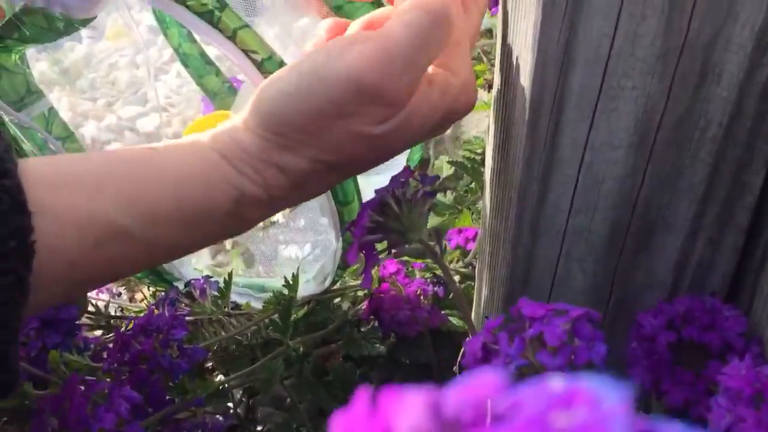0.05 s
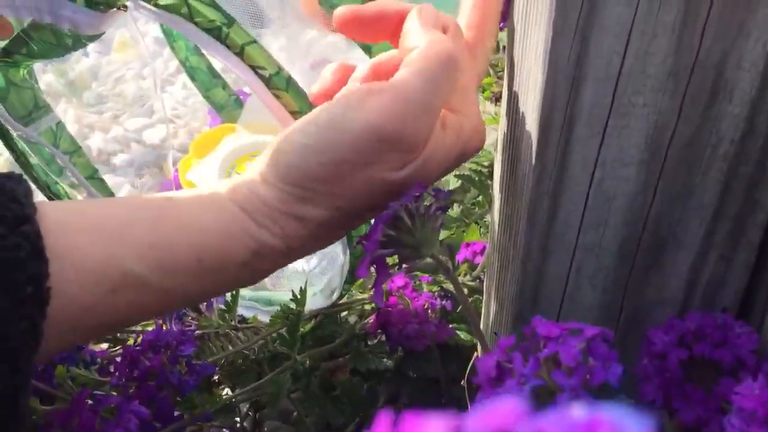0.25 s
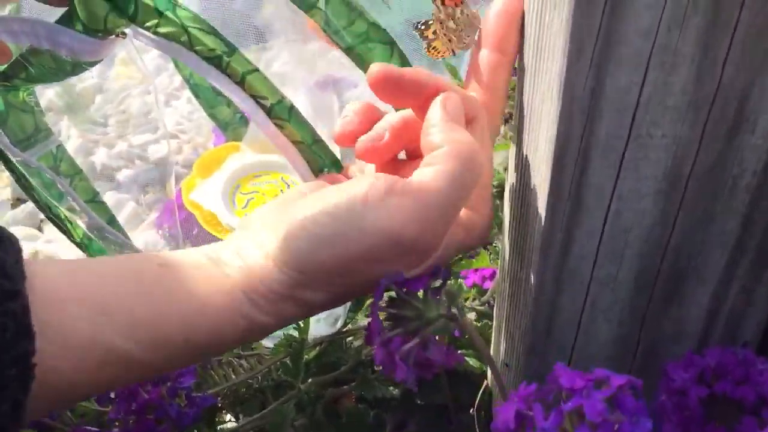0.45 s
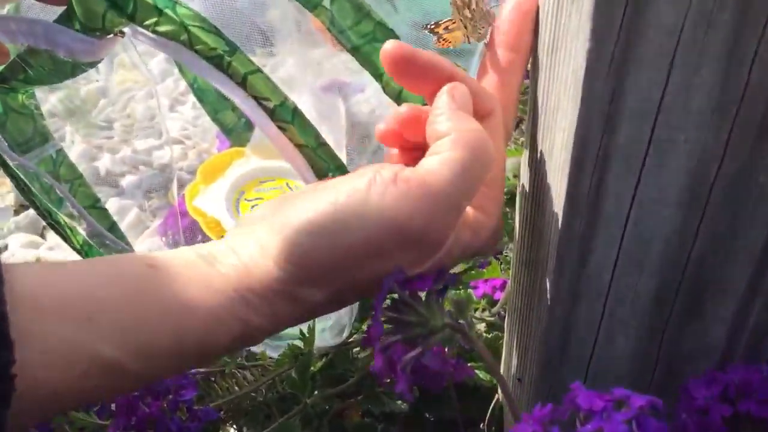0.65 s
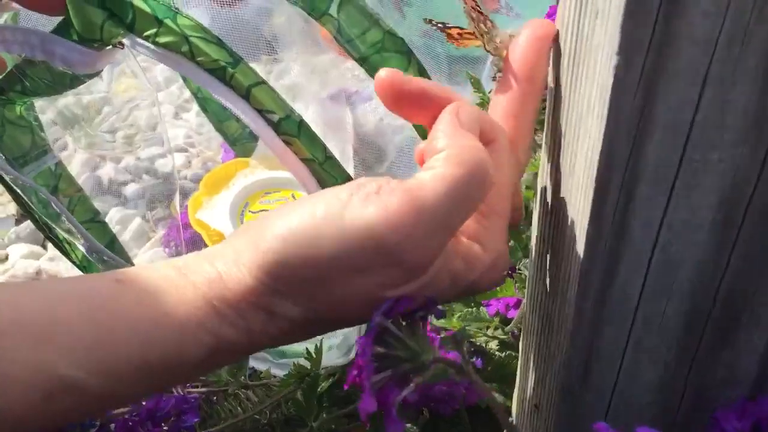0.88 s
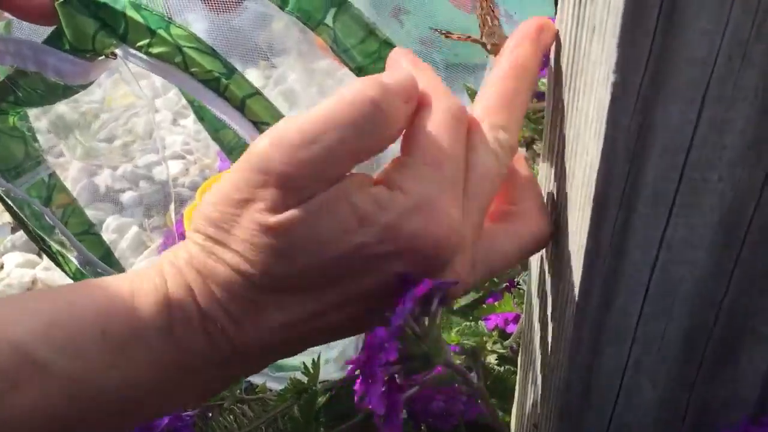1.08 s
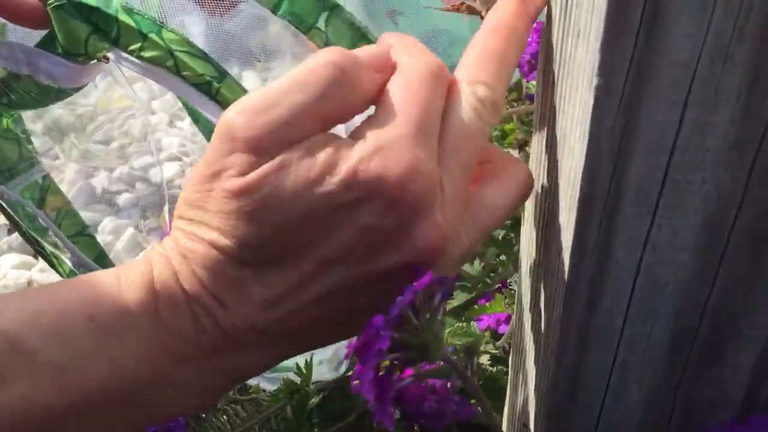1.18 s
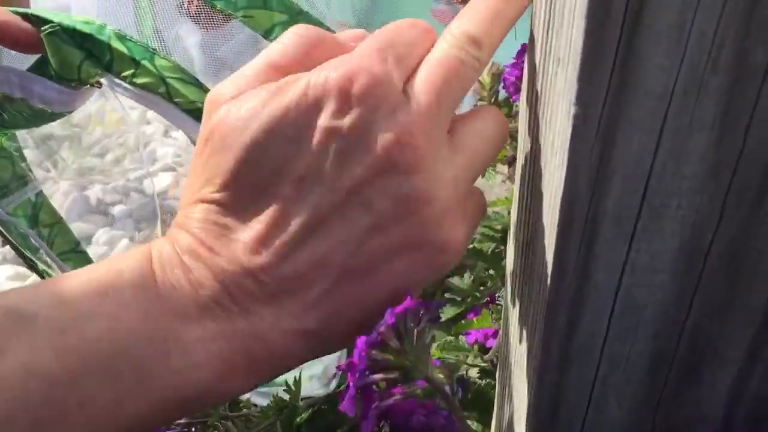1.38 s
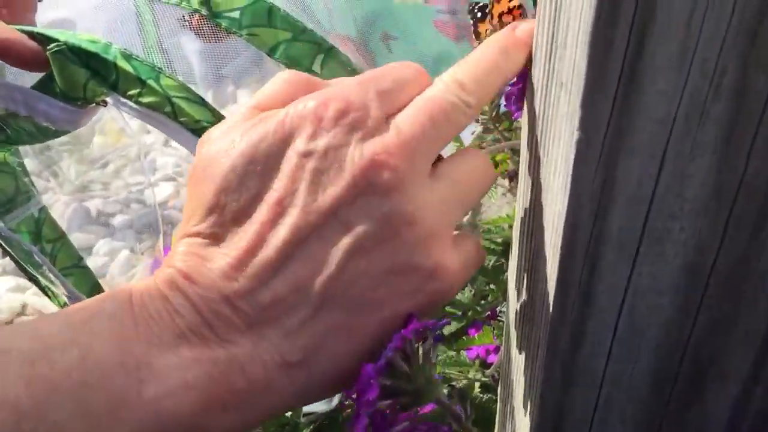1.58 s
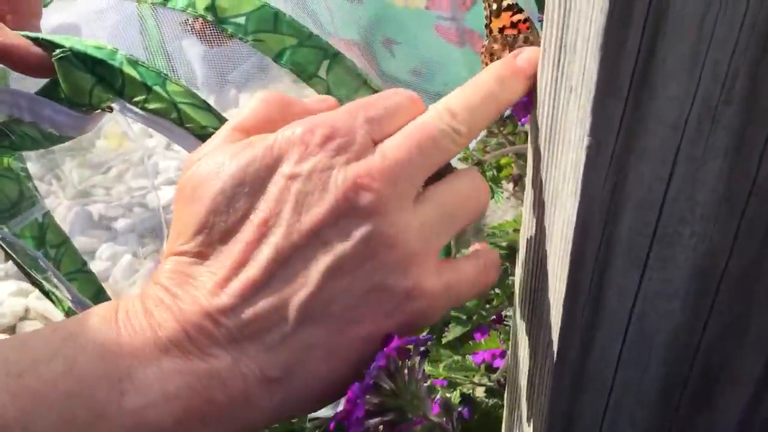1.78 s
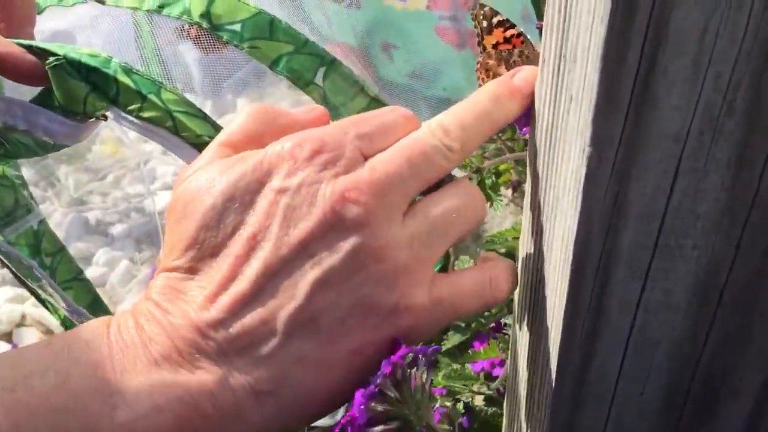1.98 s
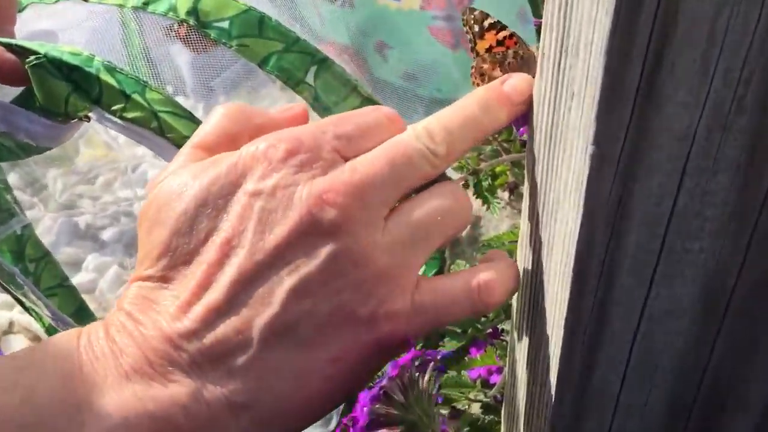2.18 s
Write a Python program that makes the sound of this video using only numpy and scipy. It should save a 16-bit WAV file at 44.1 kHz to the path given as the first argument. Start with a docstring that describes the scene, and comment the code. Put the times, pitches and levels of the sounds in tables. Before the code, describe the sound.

Gusty wind buffets a microphone outdoors, with a few dull bumps and faintly ticking leaves.

```python
"""A low, gusty rumble of wind on a hand-held microphone, in a flower bed beside a wooden post.
Swirls of air sweep past the microphone's opening and get louder and brighter with every gust.
Leaves rustle and tick faintly over a quiet outdoor hiss as they brush and slip on their stems.
A few soft thumps of handling or wind stand out of the rumble."""
import sys
import numpy as np
from scipy import signal
from scipy.fft import rfft, irfft
from scipy.io import wavfile

SR = 44100
rng = np.random.default_rng(int(sys.argv[2]) if len(sys.argv) > 2 else 0)


def wav_record(signal):
    """Record a signal, one row per channel, as 16-bit PCM in the file named by sys.argv[1]."""
    frames = np.transpose(np.atleast_2d(signal))
    bounded = np.clip(frames, -1, 1)
    # unit amplitude maps onto the largest positive 16-bit level
    quanta = np.round(bounded * 32767).astype(np.int16)
    wavfile.write(sys.argv[1], SR, quanta)


N = 99225
TIME = np.arange(N) / SR
BIN_HZ = np.maximum(np.arange(N // 2 + 1) * SR / N, 1)

# The breeze before gusts are added. Each row: time in seconds, relative level in dB,
# brightness in Hz (each step this far up in frequency leaves about a third of the strength).
BREEZE = [(0.0,-23.5,83), (0.09,-30,75.5), (0.2,-17,83.5), (0.29,-18,102), (0.38,-23.5,96.3),
          (0.45,-23.5,129.6), (0.53,-20.5,97.6), (0.595,-21,69.6), (0.62,-16,144), (0.74,-20,138),
          (0.88,-20.5,190), (0.97,-19.5,177), (1.03,-17.5,217), (1.1,-21.5,207), (1.16,-18.5,203),
          (1.27,-17,195.3), (1.36,-22.5,131.5), (1.41,-16,190), (1.48,-20.5,186), (1.55,-19,169.7),
          (1.63,-21.5,113), (1.68,-17.5,103.6), (1.72,-20.5,191.4), (1.79,-23,146), (1.88,-21.5,168),
          (1.985,-22.5,114), (2.015,-39,95), (2.17,-31,71.3), (2.25,-31,83)]
# Brief gusts. Each row: middle in seconds, half-width in seconds, change of air speed in dB.
GUST_BURSTS = [(.305,0.0049,0.5), (0.33,0.019,4.5), (0.455,0.0035,2.5), (.651,0.0053,-1.5),
               (.765,0.0054,6.5), (0.778,0.0058,4.5), (0.796,0.024,7.5), (0.824,0.0062,6), (0.842,0.0095,6),
               (0.903,0.007,1), (1.051,.011,5.5), (1.076,0.0014,4.5), (1.18,0.0057,3), (1.208,0.0075,2.8),
               (1.23,0.0022,2.7), (1.274,0.0024,4), (1.306,0.0028,3.5), (1.492,0.013,3), (1.565,0.0052,4.8),
               (1.713,0.0037,3), (1.738,0.0083,6), (1.822,0.0054,5.5)]
# The tone of wind at the microphone's opening. Each row: frequency in Hz, boost or cut in dB.
WIND_TONE = [(30, -4), (50, 2.5), (75, 3), (110, -2), (170, 1), (250, -1), (330, -3), (480, 0), (650, -1.5),
             (930, -1), (1300, -6.5), (1600, -5), (2000, -7), (3200, -8.5)]
# The tone of the outdoor hiss. Each row: frequency in Hz, boost or cut in dB.
AIR_TONE = [(350, -37), (600, -2.5), (1140, 0.5), (1280, -5), (1450, -3.5), (2070, -7.5), (3120, -9.5),
            (3890, -10), (16000, -20.5)]
# How strongly the leaves brush. Each row: time in seconds, level in dB.
RUSTLE_LEVELS = [(0, -65), (.14, -70), (.2, -69.5), (.29, -72.5), (.335, -64.5), (.38, -70), (.66, -79.5),
                 (.78, -71.5), (.86, -78), (.92, -76), (.99, -71.5), (1.025, -68), (1.11, -75),
                 (1.24, -72.5), (1.33, -82), (1.5, -70), (1.57, -79.5), (1.8, -79.5), (2.25, -98)]
# The tone of brushing leaves. Each row: frequency in Hz, boost or cut in dB.
RUSTLE_TONE = [(1000, -10), (2000, 7), (3500, -0.5), (5000, -5), (6300, 2.5), (7600, -5.5), (9300, 1),
               (10500, -6), (13000, -4.5), (16000, -5.5)]
# Single leaf slips. Each row: start in seconds, relative level in dB, stem ring boost or cut in dB.
LEAF_SLIPS = [(.06,-57.5,4), (0.128,-49.5,-11), (0.186,-55,3.5), (.223,-55,-9), (0.26,-55,2.5),
              (.296,-41,-4.5), (0.318,-59,3), (0.3205,-50.5,10), (0.369,-51.5,-3.5), (0.744,-41,-14),
              (.782,-63,-9), (0.801,-46.5,-4.5), (0.893,-51,-21), (.903,-57,-7.5), (.928,-50,-27),
              (.965,-45,-15), (1.035,-49,-3), (1.087,-45.5,-26.5), (1.126,-53,-16), (1.197,-49.5,-26),
              (1.24,-52.5,-14.5), (1.389,-63,13), (1.482,-56,-8), (1.5095,-50.5,-8.5), (1.63,-54,-6.5)]
# The tone of a leaf's scratch. Each row: frequency in Hz, boost or cut in dB.
SCRATCH_TONE = [(1200, -11), (2500, -10), (4000, -7), (5000, 1.5), (6500, 3.5), (7600, -1.5), (9300, 1),
                (10500, -4), (12500, 2.5), (16000, -4.5)]
# The notes of a stem. Each row: pitch in Hz, relative level in dB, seconds to fade by 60 dB.
STEM_NOTES = [(1900, -11, 0.0081), (2290, 1.5, 0.0093), (2923, 2.5, 0.021), (3970, -5.5, 0.032)]
# Soft thumps. Each row: start in seconds, level in dB, pitch in Hz (lower is duller).
SOFT_THUMPS = [(.329, -12, 138.7), (0.454, -21, 241), (.618, -16.5, 139.6), (0.762, -11, 308),
               (.781, -4.5, 395), (0.817, -23.5, 350), (1.142, -10.5, 193), (1.159, -10, 106.4),
               (1.277, -8, 156), (1.456, -7.5, 156.3), (1.714, -11.5, 259), (1.884, -16.5, 199),
               (1.933, -14, 150), (1.977, -25, 103)]


def from_db(db):
    """Turn decibels into a number to multiply by."""
    return 10 ** (np.asarray(db) / 20)


def unit_power(x):
    """Scale a signal so its average power is one."""
    return x / np.sqrt(np.mean(x ** 2) + 1e-20)


def over_time(rows):
    """Join a table's points with straight lines, giving one curve for each column after the time."""
    times, *columns = np.transpose(rows)
    return [np.interp(TIME, times, column) for column in columns]


def tone_gains(tone):
    """Turn a tone table into a gain for every frequency."""
    hz, db = np.transpose(tone)
    return from_db(np.interp(np.log(BIN_HZ), np.log(hz), db))


def with_tone(x, tone):
    """Give a signal a tone, at a power of one."""
    return unit_power(irfft(rfft(x) * tone_gains(tone), N))


def wobble(rate_hz):
    """A smooth random curve with a typical size of one; a higher rate moves faster."""
    return unit_power(irfft(rfft(rng.standard_normal(N)) / (1 + (BIN_HZ / rate_hz) ** 2), N))


def band(spectrum, centres, index):
    """The sound in one of several overlapping frequency bands that add up to the whole."""
    return irfft(spectrum * np.interp(BIN_HZ, centres, np.eye(len(centres))[index]), N)


def swirls(smooth_s=0.034, evenness=0.99):
    """Churning air: white noise whose slow swells are evened out, band by band."""
    white, out = rfft(rng.standard_normal(N)), 0
    centres_hz = [20, 75, 190, 450, 1100, 2600]
    for k in range(len(centres_hz)):
        noise = band(white, centres_hz, k)
        power = signal.fftconvolve(noise ** 2, np.hanning(int(2 * smooth_s * SR)), "same")
        out = out + noise * (power / power.mean()) ** (-evenness / 2)
    return out


def wind(flutter_db=1.0751, loudness_per_speed=0.54):
    """Faster air sweeps smaller swirls past the microphone, so the rumble gets louder and brighter."""
    level_db, brightness_hz = over_time(BREEZE)
    speed_db = sum(db * np.exp(-.5 * ((TIME - middle) / width) ** 2) for middle, width, db in GUST_BURSTS)
    speed_db = speed_db + flutter_db * wobble(rate_hz=60)
    reach_hz = brightness_hz * from_db(speed_db)
    spectrum = rfft(swirls()) * np.sqrt(SR / 200) * tone_gains(WIND_TONE)
    centres_hz = np.geomspace(20, 6000, 40)
    # Bands far above the reach are almost silent.
    rumble = sum(band(spectrum, centres_hz, k) * np.exp(-hz / reach_hz)
                 for k, hz in enumerate(centres_hz[:-1]))
    return rumble * from_db(loudness_per_speed * speed_db + level_db)


def outdoor_air(level_db=-72):
    """Still air outdoors is a quiet, steady hiss."""
    return from_db(level_db) * with_tone(rng.standard_normal(N), AIR_TONE)


def vary_leaf_tone(x, swing_db=4.5, rate_hz=34):
    """Each leaf has its own tone, so the treble bands rise and fall separately; the power is one."""
    spectrum, centres_hz = rfft(x), np.geomspace(1500, 16000, 15)
    return unit_power(sum(band(spectrum, centres_hz, k) * from_db(swing_db * wobble(rate_hz))
                          for k in range(len(centres_hz))))


def leaf_rustle(clicks_per_s=2000, spread_db=1):
    """Leaves brush each other, making a dense run of tiny clicks of uneven size."""
    sizes = from_db(spread_db * np.minimum(rng.exponential(1, N), 4))
    signs = rng.choice([-1, 1], N)
    clicks = sizes * signs * (rng.random(N) < clicks_per_s / SR)
    level_db, = over_time(RUSTLE_LEVELS)
    return vary_leaf_tone(with_tone(clicks, RUSTLE_TONE)) * from_db(level_db)


def leaf_ticks(level_db=-9.5, knock_db=-5, rise_s=0.0029, fade_s=0.0037):
    """A leaf slips with a short, bright scratch, then its stem snaps back and rings."""
    scratch_level, knocks = np.zeros((2, N))
    for start, db, stem_db in LEAF_SLIPS:
        age = np.maximum(TIME - start, 0)
        rise = np.minimum(age / rise_s, 1)
        fade = np.exp(-np.maximum(age - rise_s, 0) / fade_s)
        slip = from_db(db + level_db) * rise * fade
        scratch_level += slip
        # The stem gets one knock at the loudest moment of the scratch.
        knocks[np.argmax(slip)] += from_db(stem_db + knock_db) * np.sqrt(np.sum(slip ** 2))
    scratch = vary_leaf_tone(with_tone(rng.standard_normal(N), SCRATCH_TONE))
    return scratch_level * scratch + stem_ring(knocks + 1e-18)


def stem_ring(knocks):
    """A knocked dry stem rings with a few short, woody notes."""
    out = 0
    for hz, db, fade_s in STEM_NOTES:
        kept = from_db(-60 / (fade_s * SR))   # share of the ring left after each sample
        feedback = [1, -2 * kept * np.cos(2 * np.pi * hz / SR), kept * kept]
        note = signal.lfilter([1, 0, -1], feedback, knocks)
        out = out + from_db(db) * np.sqrt((1 - kept * kept) / 2) * note
    return out


def thumps(fade_cycles=0.26):
    """Each thump is one smooth push and pull of pressure that dies within a cycle or two."""
    out = np.zeros(N)
    for start, db, hz in SOFT_THUMPS:
        cycles = np.maximum(TIME - start, 0) * hz
        swell = cycles ** 3 * np.exp(-cycles / fade_cycles)
        push = swell * np.sin(2 * np.pi * cycles)
        out += from_db(db) * push / np.abs(push).max()
    return out


def scene():
    """Add the wind and thumps on the microphone to the air and leaves beyond it, in one channel."""
    air = outdoor_air()
    fade_in = np.minimum(TIME / .004, 1)
    return (fade_in * wind() + air + leaf_ticks() + leaf_rustle() + thumps())[None]


def record(dry, low_cut_hz=60, high_cut_hz=17150):
    """The microphone drops the deepest bass, and the highest treble is cut steeply."""
    bass_cut = signal.butter(3, low_cut_hz, "high", fs=SR, output="sos")
    treble_cut = signal.ellip(10, .1, 80, high_cut_hz, fs=SR, output="sos")
    return signal.sosfilt(treble_cut, signal.sosfilt(bass_cut, dry))


dry = scene()
out = record(dry)
wav_record(out)
```